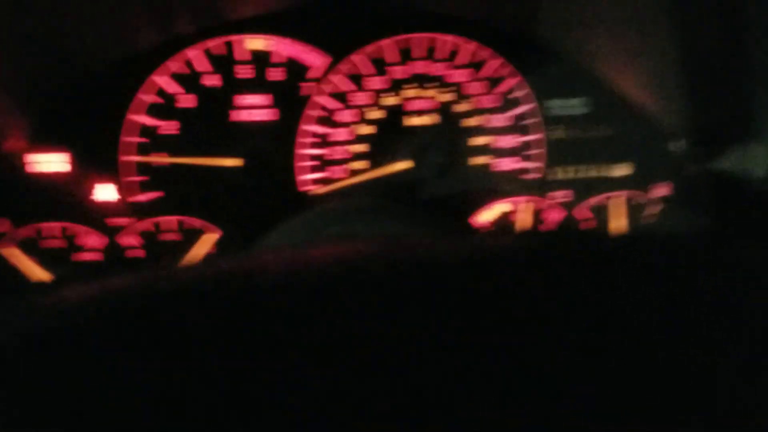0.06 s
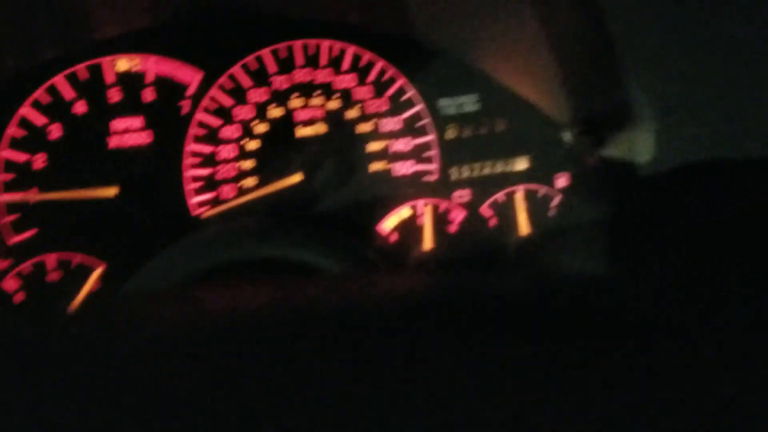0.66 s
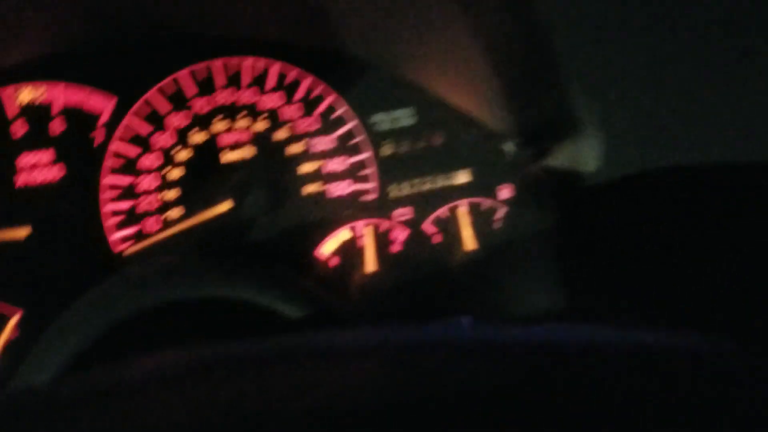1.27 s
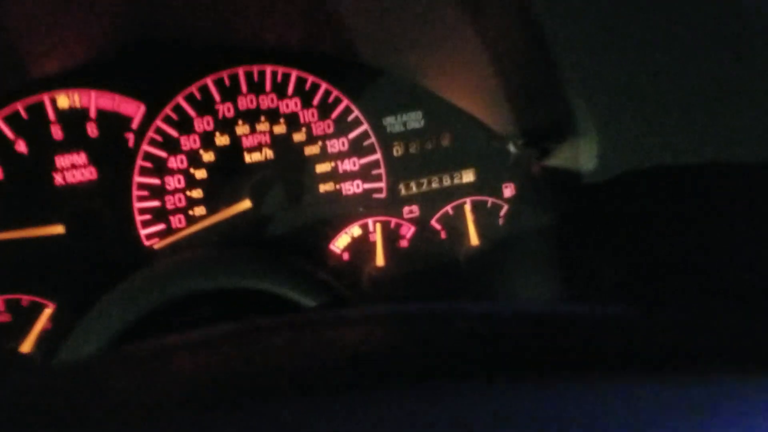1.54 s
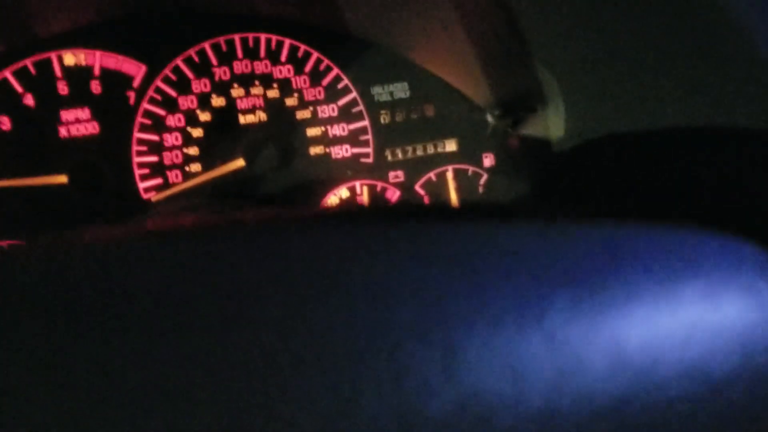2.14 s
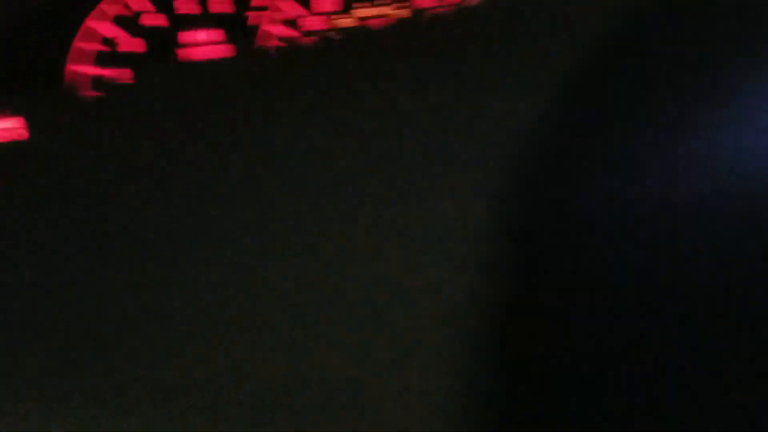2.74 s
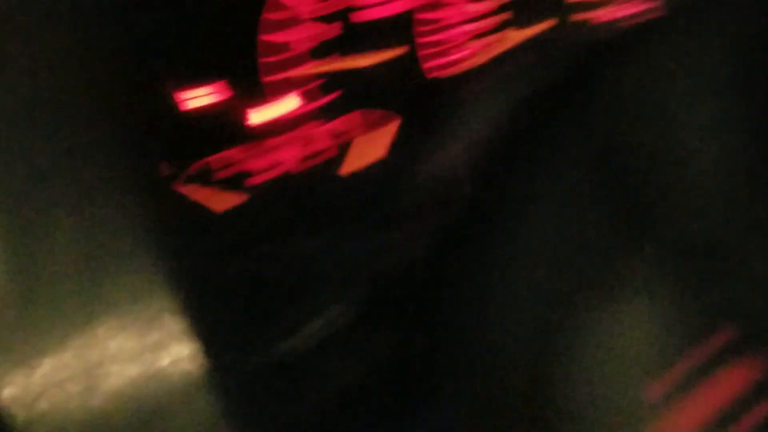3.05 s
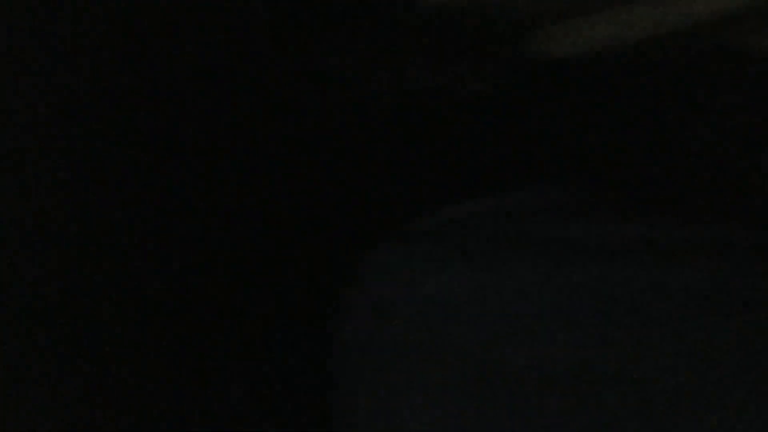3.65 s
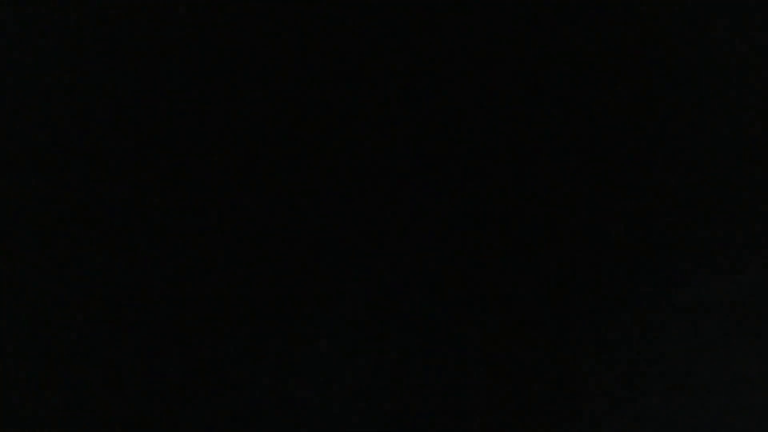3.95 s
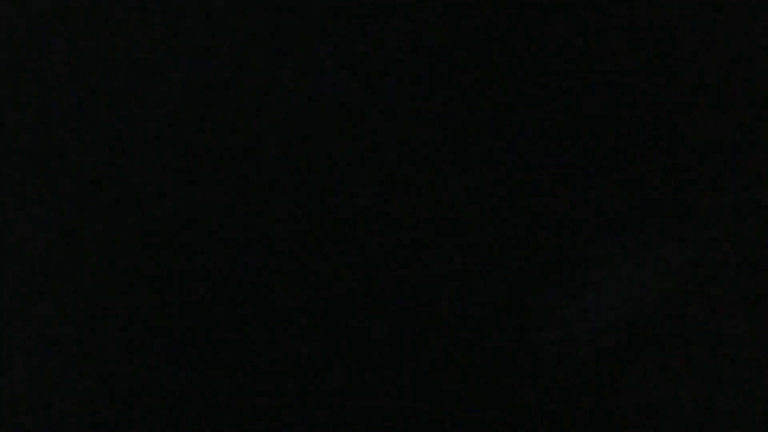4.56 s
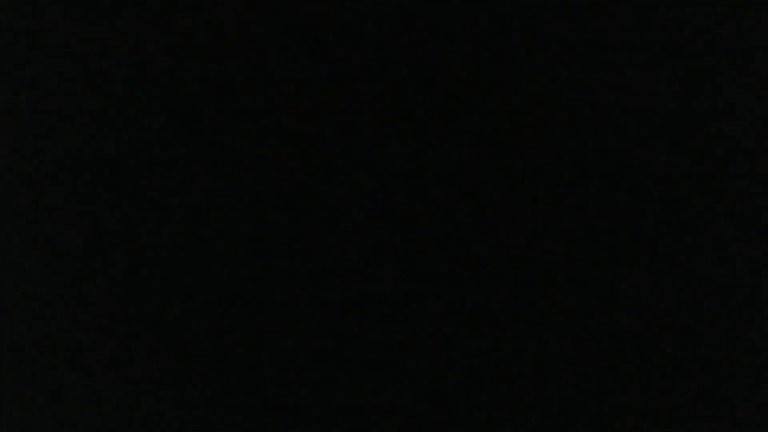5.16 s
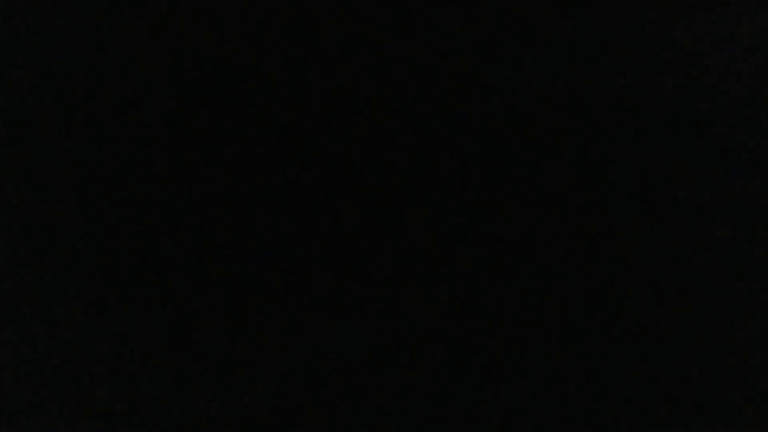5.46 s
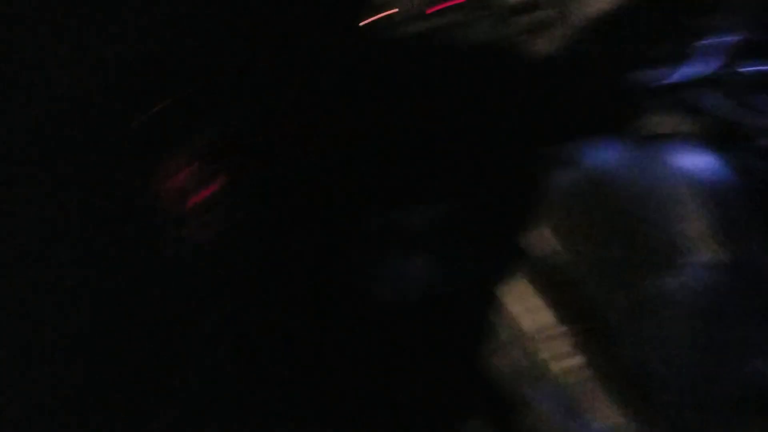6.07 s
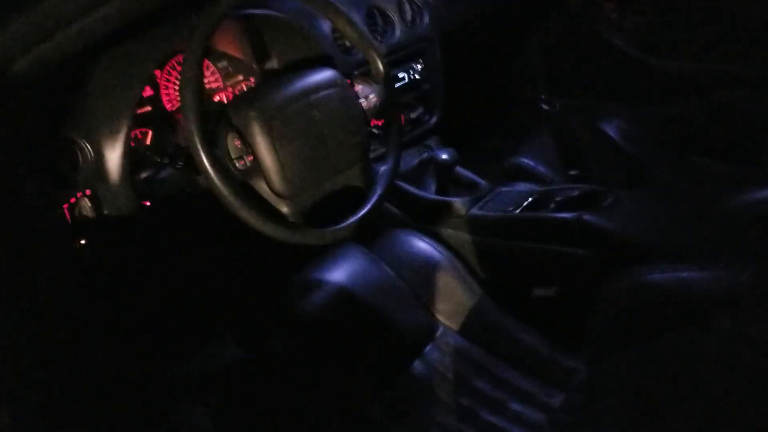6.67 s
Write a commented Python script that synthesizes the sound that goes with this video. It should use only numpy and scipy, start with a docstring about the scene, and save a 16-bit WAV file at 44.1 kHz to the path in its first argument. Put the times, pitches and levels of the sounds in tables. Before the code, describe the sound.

A V8 car engine idles with a lumpy, booming lope in a garage, with a door latch snap, seat creaks and one sharp knock.

```python
"""In a garage, a V8 on a lumpy idle: a small stereo microphone starts at the driver's seat, then moves
out beside the open door. Uneven firings boom through exhaust, cabin and garage; every cycle or two a
hard one chuffs, with a hiss and a swell of the bass. Fan and valve gear clatter further off. Close by,
plastic trim is knocked, the door latch snaps open and the seat creaks as the listener climbs out."""
import sys
import numpy as np
from scipy import signal
from scipy.fft import rfft, irfft, next_fast_len
from scipy.io import wavfile
from scipy.ndimage import uniform_filter1d

SR = 44100
rng = np.random.default_rng(int(sys.argv[2]) if len(sys.argv) > 2 else 0)


def to_wav(s):
    """Save 16-bit WAV."""
    ch = np.atleast_2d(s).T  # columns
    pcm = np.round(np.clip(ch, -1, 1) * 32767)  # PCM
    wavfile.write(sys.argv[1], SR, pcm.astype(np.int16))


N = 300321
TIME = np.arange(N) / SR


def from_db(db):
    """Decibels to gain."""
    return 10 ** (np.asarray(db) / 20)


def rms_one(x):
    """Scale to rms 1."""
    return x / np.sqrt(np.mean(x ** 2) + 1e-20)


def in_time(rows):
    """The columns of a curve at every sample."""
    s, *columns = np.transpose(rows)
    return [np.interp(TIME, s, c) for c in columns]


def at_hz(points, hz):
    """Read a spectrum on a log-frequency axis."""
    f, value = np.transpose(points)
    return np.interp(np.log(hz + 1e-9), np.log(f), value)


def butter(x, hz, kind, order=2):
    """Causal Butterworth filter."""
    sections = signal.butter(order, np.clip(hz, 10, .45 * SR), kind, fs=SR, output="sos")
    return signal.sosfilt(sections, x + 1e-18)


def drift(hz):
    """Random wander of rms 1, mostly slower than hz."""
    pole = np.exp(-80 * np.pi * hz / SR)
    noise = rng.standard_normal(N // 40 + 2002)   # one value every 40 samples
    slow = signal.lfilter([1], [1, -2 * pole, pole * pole], noise)[2000:]
    return np.interp(np.arange(N) / 40, np.arange(len(slow)), rms_one(slow))


def steady(x, span_s):
    """Even out the level over a short span."""
    power = np.mean(np.atleast_2d(x), axis=0) ** 2
    for _ in range(2):
        power = uniform_filter1d(power, max(int(span_s * SR), 1))
    return x / np.sqrt(np.abs(power) + 1e-12)


def bursts(times, gains, t60s):
    """Envelope of sudden onsets that die away."""
    power = np.zeros(N)
    for s, gain, t60 in zip(times, gains, t60s):
        start = max(int(s * SR), 0)
        age = TIME[:min(int(t60 * SR) + 1, N - start)]
        power[start:start + len(age)] += (gain * from_db(-60 * age / t60)) ** 2
    return np.sqrt(power)


# how alike the microphone's two sides are: (frequency [Hz], correlation before clipping [ratio])
STEREO_LIKENESS = [(300, -1.7), (500, 0.98), (1000, -0.11), (2000, -0.05), (4000, 0.0035), (15000, -0.044)]

def diffuse(spectrum, low_hz, high_hz):
    """Coloured noise from all around the microphone; its mid has rms 1 between the two frequencies."""
    size = next_fast_len(N, real=True)
    hz = np.arange(size // 2 + 1) * SR / size
    gain = from_db(at_hz(spectrum, hz)) / np.sqrt(1 + (spectrum[0][0] / (hz + 1)) ** 8)
    gain /= np.sqrt(np.mean(gain ** 2 * ((hz > low_hz) & (hz < high_hz))))
    alike = np.clip(at_hz(STEREO_LIKENESS, hz), -.6, 1)
    mid, side = rfft(rng.standard_normal((2, size))) * gain
    return irfft(mid + side * np.sqrt((1 - alike) / (1 + alike)) * [[1], [-1]], size)[:, :N]


def reflections(x, wall_db=-19, count=6):
    """Glass and panels near the microphone throw back early echoes that ripple the spectrum."""
    out = x.copy()
    for channel, delays_s in enumerate(rng.uniform(.0093, .04, (2, count))):
        for lag in (delays_s * SR).astype(int):
            out[channel, lag:] += from_db(wall_db) * x[channel, :-lag]
    return out / np.sqrt(1 + count * from_db(wall_db) ** 2)


# the eight firings of one cycle: (strength [dB], lag through the manifold [firing intervals])
FIRING_CYCLE = [(0, 0.00027), (0, 0.3153), (2.5, 0.315), (-0.5, 0.0091), (0.5, 0.302), (0.5, 0.003), (2, 0),
                (3, 0.2986)]

def crank(idle_rpm=845.7, hunt=.02, jitter=.06, uneven_db=3.5):
    """Times and strengths of the firings: the speed hunts and each charge burns differently."""
    fired = np.cumsum(idle_rpm / 60 * 4 * (1 + hunt * drift(2.5))) / SR   # four firings a turn
    k = np.arange(int(fired[-1]) - 1)
    level_db, lag = np.array(FIRING_CYCLE)[k % 8].T
    timing, burn = rng.standard_normal((600, 2))[:len(k)].T
    times = np.interp(k + lag + jitter * timing, fired, TIME)
    return times, from_db(level_db + uneven_db * np.minimum(burn, 1.5))


def swell(times, levels_db, delay_s, attack_s, hold_s, t60):
    """Rise in dB over the steady level: each chuff builds up quickly, holds and dies away."""
    power = np.ones(N)
    age = TIME[:int((attack_s + hold_s + t60) * SR)]
    shape = np.minimum(age / attack_s, 1) * from_db(-60 * np.maximum(age - attack_s - hold_s, 0) / t60)
    for s, db in zip(times, levels_db):
        start = max(int((s + delay_s) * SR), 0)
        power[start:start + len(age)] += (from_db(db) * shape[:N - start]) ** 2
    return 10 * np.log10(power)


# chuffs against the steady level: (time [s], hiss [dB], boom [dB], drone [dB])
HARD_FIRINGS = [(-0.004, 7.5, 6, -16), (0.115, -16, 3.5, 5), (0.284, 2.5, 5.5, -11), (0.57, 6.0, -10.0, -7),
                (0.661, 7, -8, -15), (0.811, -12, -14, 3.5), (1.125, 4, 9.5, -15), (1.265, -9, 3.0, 2),
                (1.405, 6.5, 4, 3.5), (1.702, 8.5, 0, -12), (1.825, 5.0, 5.5, 1.0), (1.993, 2.5, -8, -6),
                (2.08, 2, -6, 1.5), (2.243, 6.5, 9.0, 6), (2.535, 5, 6.5, -15), (2.704, 2, 10.5, 4),
                (2.962, -2.5, 1, 0), (3.228, 6.5, -12, 4.5), (3.523, 8, 7.5, 7), (3.635, -1, 0, 5.0),
                (3.752, 8.5, 6, 4), (3.931, 4.5, 4, 1.5), (4.065, -15, -7.0, 10.0), (4.221, 7, 7.5, 4.0),
                (4.337, 6, -1.0, 9), (4.548, 4, 3, 6.5), (4.645, 2, -2, 7), (4.792, 6.5, 1.5, 7.5),
                (4.884, 6.5, 3, 13.5), (5.056, 7, -4, 9.5), (5.141, -4, -6.0, 5.5), (5.307, 6.5, 2.5, 7.5),
                (5.395, -3, -6, 4.5), (5.574, -2, 5.5, 6), (5.647, 2.5, -9, 2), (5.825, 2.5, 1, 6),
                (5.943, 6, 5, -15), (6.113, 3, 5.5, 0.5), (6.334, 5.5, 6, 1), (6.385, 5, -13, -5),
                (6.497, 1.5, -1, -4), (6.657, 2, -3, -15), (6.726, -5, -0.5, 2)]

def chuffs():
    """Hard firings make the idle lope: the swells of hiss, boom and drone, in dB."""
    times, hiss_db, boom_db, drone_db = np.transpose(HARD_FIRINGS)
    return (swell(times, hiss_db, delay_s=.011, attack_s=.011, hold_s=.029, t60=.35),
            swell(times, boom_db, delay_s=.002, attack_s=.028, hold_s=.03, t60=.2),
            swell(times, drone_db, delay_s=.008, attack_s=.03, hold_s=.035, t60=.5))


# exhaust and cabin, from the driver's seat: (frequency [Hz], width [Hz], level [dB])
CABIN_RESONANCES = [(31.2, 3.8, -20), (54.7, 23.6, 3), (75.65, 6.5, 2), (120.7, 9.9, 1.5),
                    (150.2, 30, -2.5), (186, 14.3, -5), (199.6, 21.4, -11), (227, 18.7, -7),
                    (280.4, 40, -20), (340.9, 19, -15.5), (394, 104, -29.5)]
# exhaust and garage, from beside the door: (frequency [Hz], width [Hz], level [dB])
GARAGE_RESONANCES = [(44.8, 8.3, -3), (62.6, 13.3, -6), (76.9, 11.1, -1), (103, 6.9, -5),
                     (140.2, 15.7, -8.5), (197.7, 19.6, 1.5), (221.2, 16.5, 2.5), (235.8, 16.6, -1),
                     (276.3, 19.8, -12.5), (318, 26, -18.5), (330.9, 14, -8.5), (384, 46.7, -17),
                     (470, 69, -29.5)]

def resonate(flow, outside, low_hz, high_hz):
    """The gas flow rings the resonances of one range, blended from cabin to garage."""
    cabin, garage = (sum(from_db(db) * butter(flow, [hz - width / 2, hz + width / 2], "band")
                         for hz, width, db in modes if low_hz <= hz < high_hz)
                     for modes in (CABIN_RESONANCES, GARAGE_RESONANCES))
    return np.sqrt(1 - outside) * cabin + np.sqrt(outside) * garage


# standing waves tilt the boom at the microphone: (time [s], bottom against top [dB])
BOOM_BALANCE = [(0, 0), (2.2, 2), (2.8, -2), (3.5, -1), (4.2, 1), (4.8, -8), (5.3, -5), (6, -3), (6.8, 7)]
# they tilt the drone too: (time [s], top against bottom [dB])
DRONE_BALANCE = [(0, -6.5), (1.6, -6), (2.8, -3.5), (3.4, 2.5), (4.3, 1), (4.9, -4.5), (5.4, -11),
                 (5.8, -10), (6.3, -6), (6.8, 5.5)]
# relative exhaust levels along the microphone's path, between chuffs:
# (time [s], deep boom [dB], hollow hum [dB], pipe drone [dB], upper burble [dB], hiss [dB])
EXHAUST_LEVELS = [(0.0, -12.5, -22.5, -22.5, -32, -51.5), (0.3, -16, -19.5, -19, -35.5, -49.5),
                  (0.42, -18.5, -20.5, -24.5, -36, -54.5), (0.6, -16.5, -25, -22.0, -32.5, -55),
                  (0.85, -9.5, -18, -19, -31, -49.5), (1.05, -20.5, -26.5, -27.5, -34.5, -52),
                  (1.35, -23.5, -32, -27.5, -42, -60), (1.7, -26.5, -33, -27.5, -45.5, -64.5),
                  (2.1, -23.5, -31.0, -26.5, -43, -61), (2.35, -19, -23, -22.5, -39.5, -52.5),
                  (2.75, -17.5, -21, -14.5, -33.5, -51.5), (3.1, -16, -22.5, -19.5, -29.5, -47.5),
                  (3.6, -17, -19, -15.5, -29.5, -48), (4.3, -16.0, -20, -17.5, -29, -48.5),
                  (4.9, -13.5, -23.5, -20.5, -30.0, -51), (5.55, -16, -20, -18.0, -28.5, -48.5),
                  (6.1, -17.5, -25, -22, -29, -48), (6.8, -14.5, -16.0, -20, -29, -43.5)]

def exhaust(times, strengths, outside, swells, turbulence=.42, puff_t60=.046, muffler_hz=247):
    """Each firing is a pressure pulse with a turbulent puff; both ring in pipes, cabin and garage."""
    pulses = np.zeros(N)
    pulses[np.minimum((times * SR).astype(int), N - 1)] = strengths
    puffs = bursts(times, strengths, np.full(len(times), puff_t60)) * rng.standard_normal((2, N))
    mid = rms_one(pulses) + turbulence * rms_one(puffs[0])
    side = from_db(-21) * rms_one(puffs[1])
    flow = mid + side * [[1], [-1]]
    bands_hz = [(0, 52), (52, 100), (100, 165), (165, 209), (209, 255), (255, 600)]
    deep, thud, hum, low_drone, high_drone, burble = (resonate(flow, outside, *b) for b in bands_hz)
    boom = from_db(in_time(BOOM_BALANCE)[0]) * deep + thud
    drone = low_drone + from_db(in_time(DRONE_BALANCE)[0]) * high_drone
    drone = butter(drone, muffler_hz, "low", order=14)
    # standing waves set each range's level as the microphone moves; the chuffs swell on top
    boom_db, hum_db, drone_db, burble_db, _ = in_time(EXHAUST_LEVELS)
    hiss_swell, boom_swell, drone_swell = swells
    boom = steady(boom, span_s=.098) * from_db(boom_db - 3 + boom_swell)
    hum = steady(hum, span_s=.14) * from_db(hum_db - 1 + .17 * (boom_swell + drone_swell))
    drone = steady(drone, span_s=.23) * from_db(drone_db - 2 + drone_swell)
    burble = steady(burble, span_s=.12) * from_db(burble_db - 3.5 + .37 * (hiss_swell + drone_swell))
    left, right = boom + hum + drone + burble
    # the door is on the left, so the right side hears it later
    return np.array([left, np.interp(TIME - .00022, TIME, right)])


# gas leaving the tailpipes: (frequency [Hz], spectral density [dB])
GAS_SPECTRUM = [(1500, -21), (3500, 8), (5000, 6), (7000, 5.5), (8500, 0), (10500, 1.5), (12500, 4),
                (14000, 2), (16000, 0)]

def tailpipe_hiss(chuff_db, gain_db=-3, grain_db=1.26):
    """Gas hisses out of the pipes and spurts with each chuff."""
    level_db = in_time(EXHAUST_LEVELS)[-1] + chuff_db
    jet = reflections(diffuse(GAS_SPECTRUM, 6360, 17700), wall_db=-17)
    return jet * from_db(level_db + gain_db + grain_db * drift(89))


# pump and pulley tones, from the driver's seat: (frequency [Hz], relative level [dB])
PULLEY_TONES = [(2169, -17), (2950, -24), (3208, -22), (4102, -23), (4732, -23)]

def pulley_whine(gain_db=-2, waver=.00406):
    """Pump and belt pulleys whine faintly, each tone wavering in pitch."""
    whine = 0
    for hz, db in PULLEY_TONES:
        speed = 1 + waver * np.array([drift(47), drift(14.3)])
        whine += from_db(db + gain_db) * np.sin(2 * np.pi * hz * np.cumsum(speed, axis=1) / SR)
    return whine


# engine bay from the driver's seat: (frequency [Hz], spectral density [dB])
BAY_FROM_SEAT = [(280, -17), (480, 1), (586, -19), (622, -13), (733, -0.5), (796, -7.5), (1090, -8.5),
                 (1500, -9), (2020, -2.5), (2710, -9), (3010, -7), (3550, -14), (4100, -11.5),
                 (4900, -10.5), (6030, -24.5), (8000, -49.5), (10400, -52), (17600, -120)]
# engine bay from beside the door: (frequency [Hz], spectral density [dB])
BAY_FROM_DOOR = [(280, -20), (480, 8), (546, -4.5), (600, 0.5), (815, -8), (950, -7.5), (1080, -4),
                 (1280, -6.5), (1470, -9), (1860, -11), (2190, -7.5), (3350, -21), (3680, -19), (7450, -55),
                 (8000, -37), (10400, -58), (17600, -120)]
# relative levels along the microphone's path: (time [s], fan rush [dB], valve clatter [dB])
BAY_LEVELS = [(0.0, -38.0, -40.5), (0.42, -43.0, -44), (0.85, -40.0, -39.5), (1.05, -41, -44.5),
              (1.35, -48.5, -49.5), (1.7, -50, -53), (2.1, -50.5, -50), (2.35, -41.5, -43.5),
              (3.1, -36.5, -38.5), (3.6, -32.5, -34), (4.9, -35, -39), (5.55, -34, -38),
              (6.1, -35.0, -36.0), (6.8, -32, -33.5)]

def engine_bay(times, strengths, outside, chuff_db, tap_depth=1.12, tap_t60=.26):
    """Further off, fan rush and valve clatter pulse with the firings and lift with each chuff."""
    taps = rms_one(bursts(times, strengths, np.full(len(times), tap_t60)))
    pulsing = rms_one(np.sqrt(1 + (tap_depth * taps) ** 2))
    air = np.sqrt(1 - outside) * diffuse(BAY_FROM_SEAT, 500, 4000)
    air += np.sqrt(outside) * diffuse(BAY_FROM_DOOR, 500, 4000)
    rush = steady(butter(butter(air, 532, "high", order=4), 1240, "low", order=4), span_s=.22)
    clatter = steady(butter(butter(air, 1555, "high", order=4), 6500, "low"), span_s=.15)
    clatter = clatter * pulsing + pulley_whine() * np.sqrt(1 - outside)
    rush_db, clatter_db = in_time(BAY_LEVELS)
    return (from_db(rush_db - 3 + .22 * chuff_db) * rush * pulsing
            + from_db(clatter_db - 4 + .29 * chuff_db) * clatter)


def strikes(rows, spectrum, grit_db, bright_hz=2000):
    """Gritty cracks that die away, each with its own share of treble."""
    times, level_db, t60, bright_db = np.transpose(rows)
    crack = diffuse(spectrum, 500, 16000) * rms_one(from_db(grit_db * drift(300)))
    dull = butter(crack, bright_hz, "low", order=1)
    return (dull * bursts(times, from_db(level_db), t60)
            + (crack - dull) * bursts(times, from_db(level_db + bright_db), t60))


# knocks on the trim: (time [s], level [dB], t60 [s], brightness [dB])
TRIM_KNOCKS = [(.058, -34, 0.014, -13), (.075, -39, 0.022, 12), (.0858, -28.5, 0.021, 9.5),
               (.342, -30.5, 0.1, -8), (2.7812, -25.5, 0.025, -8), (4.5963, -14, 0.018, -8),
               (4.601, -32, 0.096, -1)]
# struck plastic: (frequency [Hz], spectral density [dB])
TRIM_SPECTRUM = [(400, 1), (1100, 8), (2000, -2.5), (3400, 1), (5000, -2.5), (7500, -17), (12000, -10),
                 (16000, -11)]

def trim():
    """Plastic trim close to the microphone gives a short crack at each knock."""
    return strikes(TRIM_KNOCKS, TRIM_SPECTRUM, grit_db=1.5)


# handle and latch, close by: (time [s], level [dB], t60 [s], brightness [dB])
LATCH_BLOWS = [(.628, -36, 0.059, 3), (.650, -36, 0.06, 6), (.658, -29, 0.073, 0.5),
               (.675, -44, 0.094, -15), (.697, -32.5, 0.2, -22), (.76, -33.5, 0.31, -15),
               (0.97, -27, 0.081, 3), (.9795, -15.5, 0.032, 6), (.9895, -22, .07, 4),
               (.9935, -19, 0.034, -6), (.998, -25, 0.078, 3), (1.0142, -26.5, 0.03, 9.5),
               (1.024, -20.5, 0.072, -5), (1.035, -39, .06, -4), (1.043, -31.5, 0.045, 4)]
# the latch's crack: (frequency [Hz], spectral density [dB])
LATCH_SPECTRUM = [(290, 1.5), (500, -13), (595, -36), (729, -6), (1000, -7), (1280, -9.5), (1530, -16),
                  (1670, -10), (4400, -10), (4730, -12.5), (7980, -22.5), (12000, -19.5), (16000, -21)]
# ringing after the blows, from the door and, in the highest tones, probably microphone or room:
# (frequency [Hz], relative level [dB], t60 [s])
LATCH_RING = [(725, 0, .08), (788, -6, .08), (955, -7, .07), (2467, -6, .08), (2796, -7, .1),
              (3208, -10, .1), (4158, -8, .12), (4935, -7, .1), (8535, -14, .08)]

def door_latch(ring_db=-19, pan_db=-.4):
    """The parts of the latch strike in quick succession, and a brief ringing follows each blow."""
    blows = strikes(LATCH_BLOWS, LATCH_SPECTRUM, grit_db=.5)
    ringing = 0
    for hz, db, t60 in LATCH_RING:
        pole, angle = from_db(-60 / (t60 * SR)), 2 * np.pi * hz / SR
        feedback = [1, -2 * pole * np.cos(angle), pole * pole]
        mode = signal.lfilter([0, 2 * np.sin(angle)], feedback, blows + 1e-18)
        ringing += from_db(db + ring_db) * np.sqrt(1 - pole * pole) * mode
    return (blows + ringing) * from_db([[pan_db], [-pan_db]])


# creaks of the driver's seat, close by: (time [s], relative level of first slip [dB], length [s])
SEAT_CREAKS = [(3.0955, -29, .015), (3.115, -26.5, .035), (3.15, -25, .015), (3.2098, -20.5, .026),
               (3.273, -19.5, .035), (3.363, -26, .005), (3.3767, -23, .026), (3.4313, -37, .005),
               (3.506, -24.5, .005), (3.5478, -29, .005), (3.6242, -22.5, .035), (3.7259, -27, .005),
               (4.3695, -32, .015)]
# slipping upholstery: (frequency [Hz], spectral density [dB])
SLIP_SPECTRUM = [(2500, -22), (3600, -8), (4500, 9), (5600, 2), (7500, -16), (10000, -11.5), (12500, -12),
                 (16000, -21)]

def seat(gain_db=1, gap_s=.0102, loss_db=4, slip_t60=.0055):
    """Upholstery sticks and slips in even runs of dry ticks, each weaker than the last."""
    slips = [(start + k * gap_s, db - k * loss_db)
             for start, db, length in SEAT_CREAKS for k in range(1 + int(length / gap_s))]
    times, level_db = np.transpose(slips)
    friction = steady(diffuse(SLIP_SPECTRUM, 3500, 14000), span_s=.001)
    return friction * bursts(times, from_db(level_db + gain_db), np.full(len(times), slip_t60))


# the microphone's way out of the car: (time [s], share of sound from outside [0-1])
MICROPHONE_PATH = [(0, 0.1), (1, 0.15), (2.2, 0.21), (3, 0.03), (3.6, 0.84), (5.8, 0.92), (6.8, 0.9)]

def scene():
    """One crankshaft drives exhaust and engine bay; trim, door and seat are close to the microphone."""
    outside = in_time(MICROPHONE_PATH)[0]
    times, strengths = crank()
    swells = chuffs()
    hiss_swell = swells[0]
    pipes = exhaust(times, strengths, outside, swells) + tailpipe_hiss(hiss_swell)
    bay = reflections(engine_bay(times, strengths, outside, hiss_swell))
    return pipes + bay + trim() + door_latch() + seat()


# balance of the microphone's two ports: (frequency [Hz], left minus right [dB])
MICROPHONE_BALANCE = [(60, 1), (200, 0.9), (700, 1.5), (1290, 0), (2380, -3), (4400, -1.3), (8120, 4.5),
                      (15000, 1)]

def ports(x):
    """The two ports face different ways, so each favours other frequencies."""
    size = next_fast_len(N + 2048, real=True)
    balance_db = at_hz(MICROPHONE_BALANCE, np.arange(size // 2 + 1) * SR / size)
    return irfft(rfft(x, size) * from_db(balance_db * [[.5], [-.5]]), size)[:, :N]


def record(dry, bass_cut_hz=26, top_cut_hz=15800):
    """The lowest bass is filtered away; the highest peaks are rounded and the top is cut."""
    heard = butter(ports(dry), bass_cut_hz, "high", order=4)
    rounded = heard / (1 + heard ** 8) ** (1 / 8)
    return signal.sosfilt(signal.ellip(10, .1, 90, top_cut_hz, fs=SR, output="sos"), rounded)


dry = scene()
out = record(dry)
to_wav(out)
```